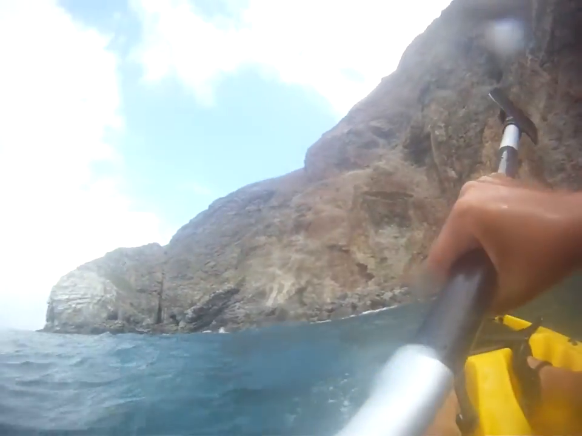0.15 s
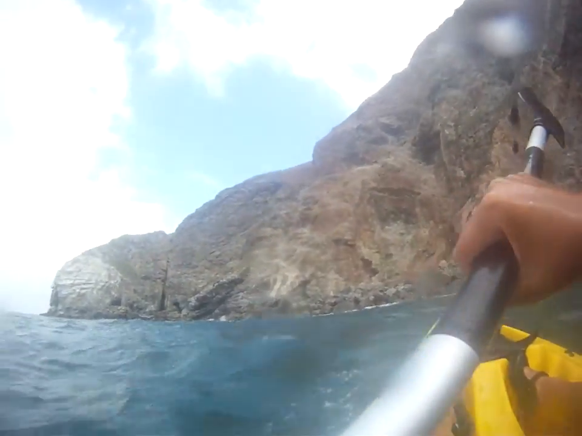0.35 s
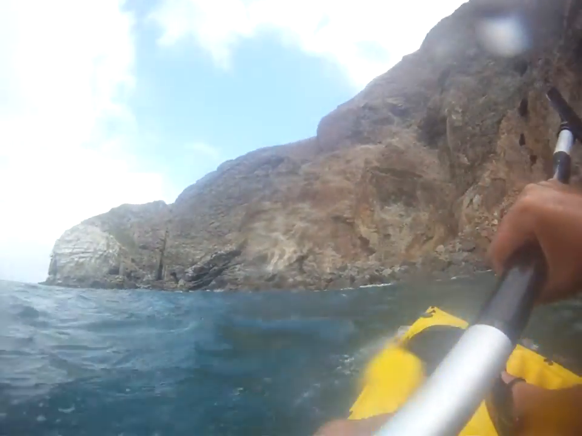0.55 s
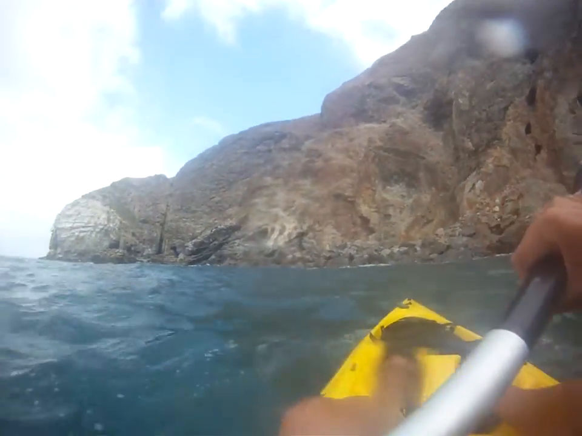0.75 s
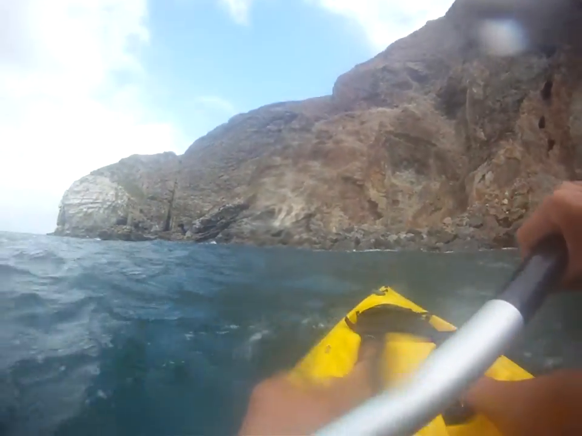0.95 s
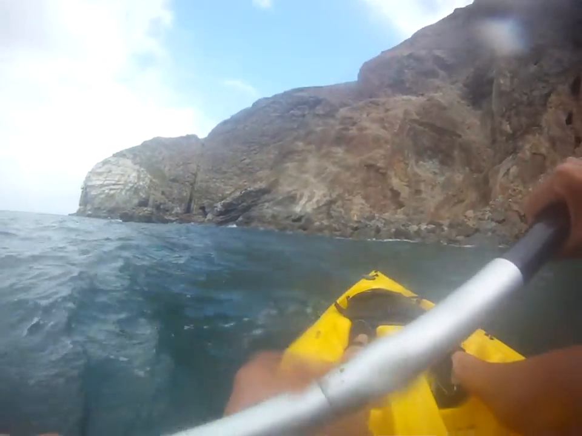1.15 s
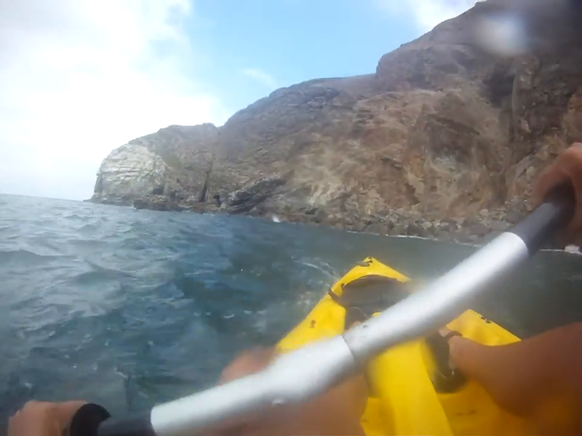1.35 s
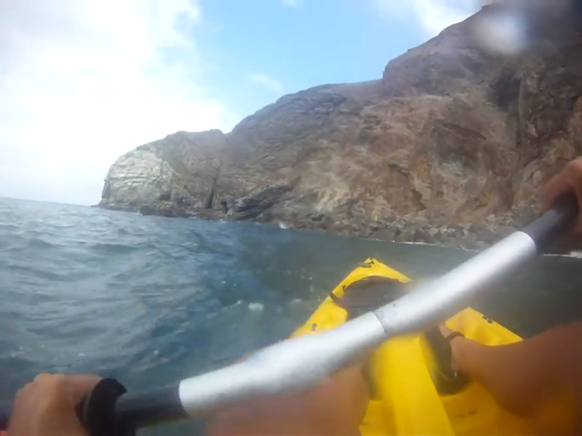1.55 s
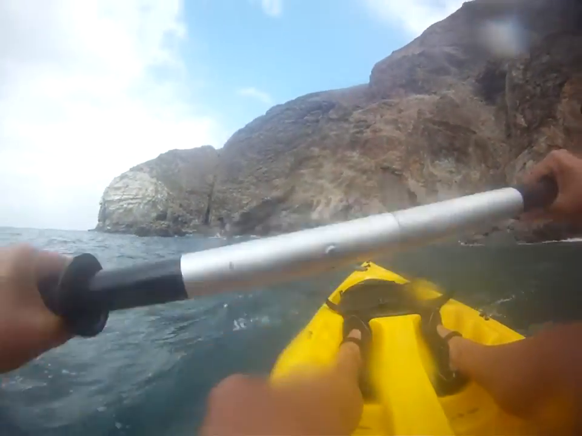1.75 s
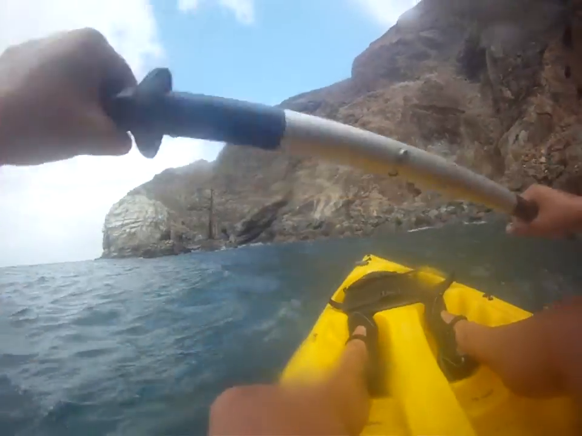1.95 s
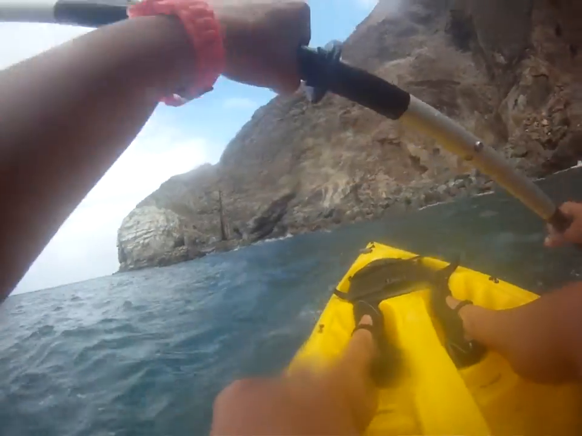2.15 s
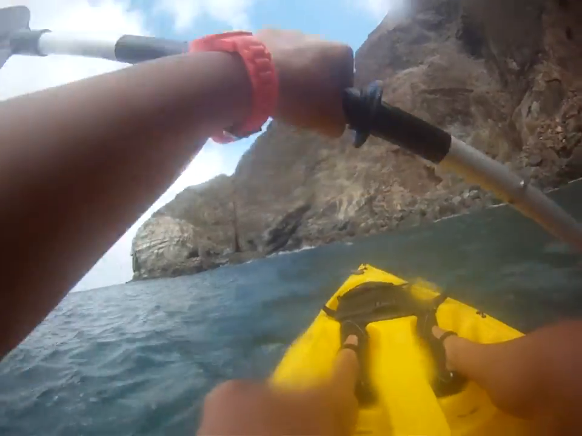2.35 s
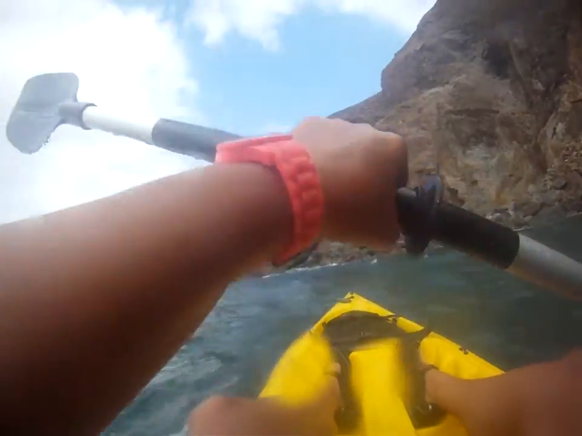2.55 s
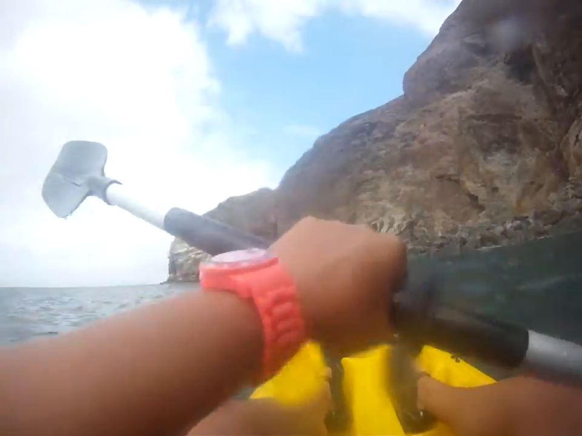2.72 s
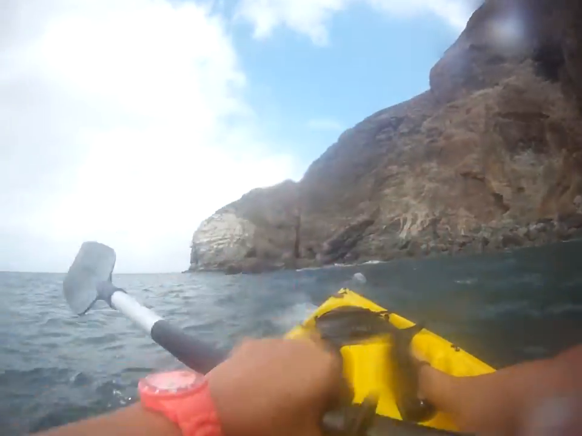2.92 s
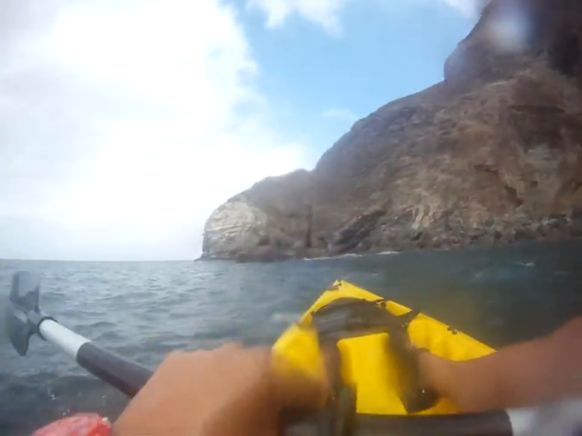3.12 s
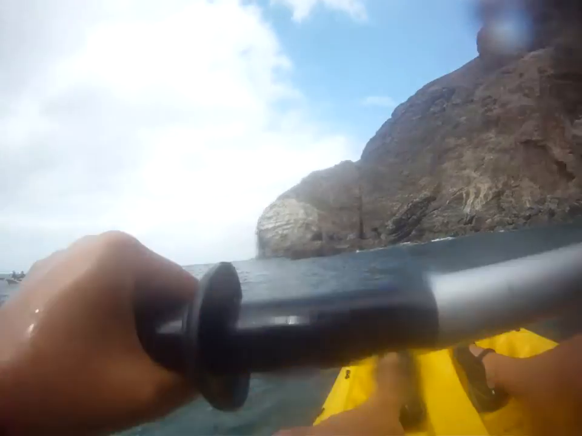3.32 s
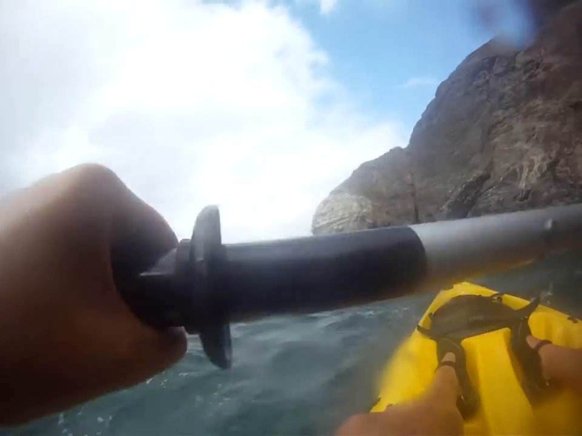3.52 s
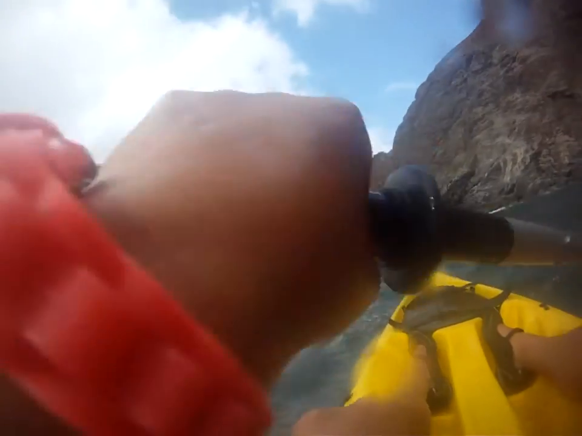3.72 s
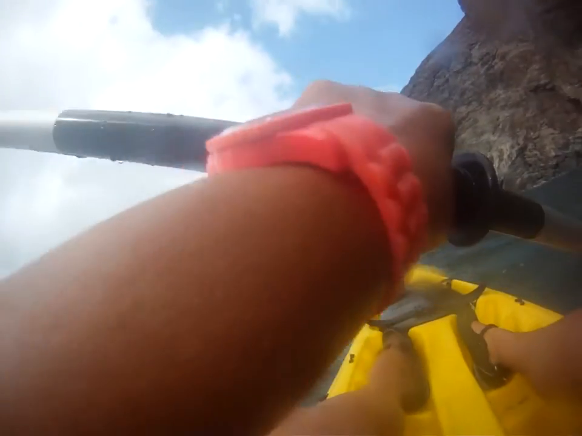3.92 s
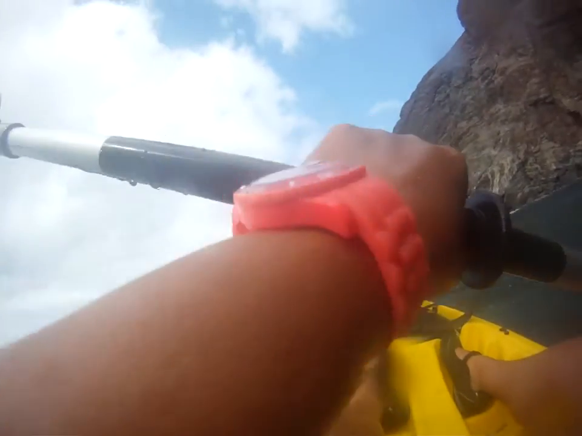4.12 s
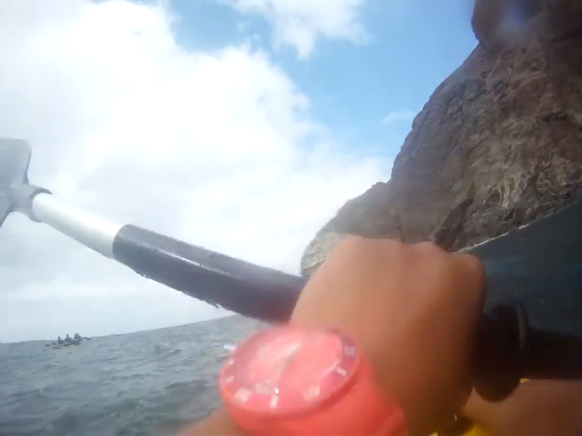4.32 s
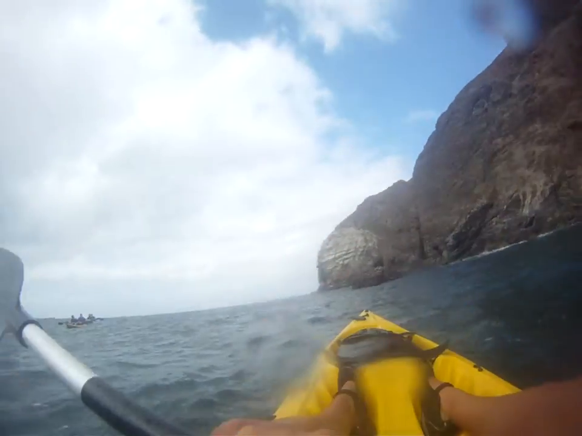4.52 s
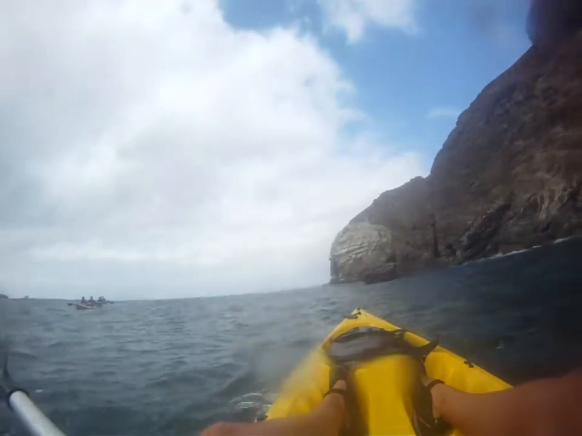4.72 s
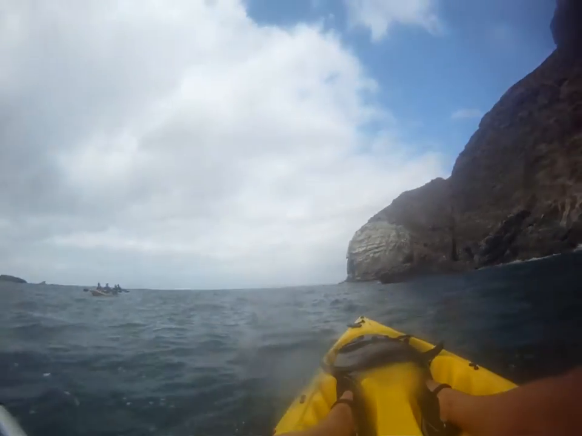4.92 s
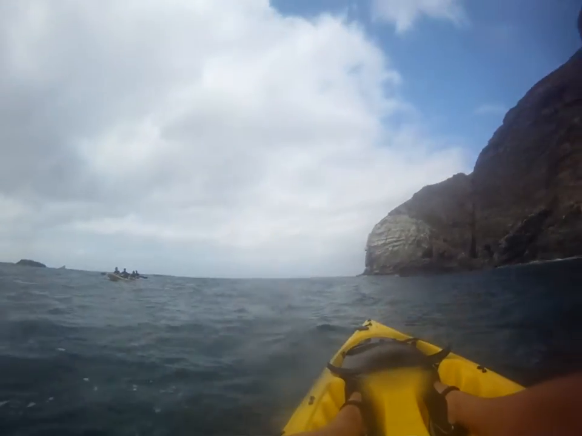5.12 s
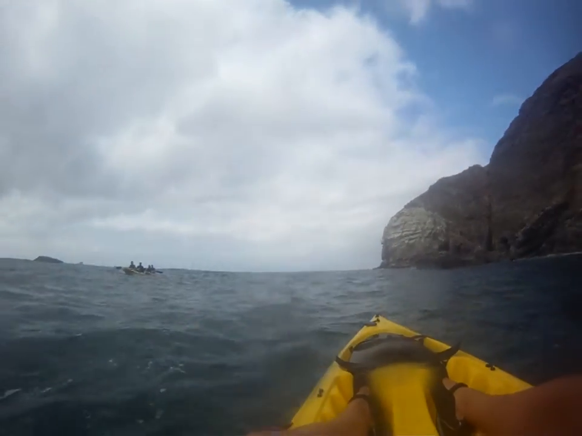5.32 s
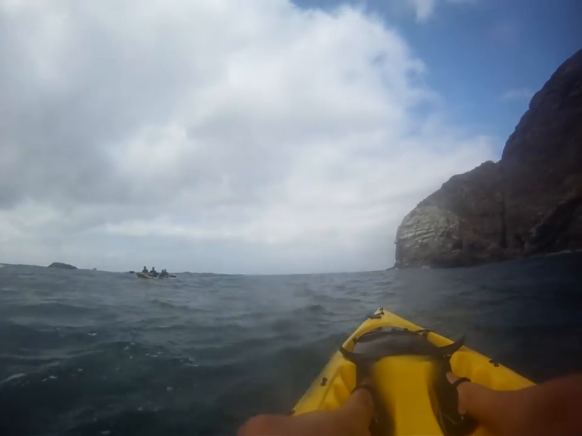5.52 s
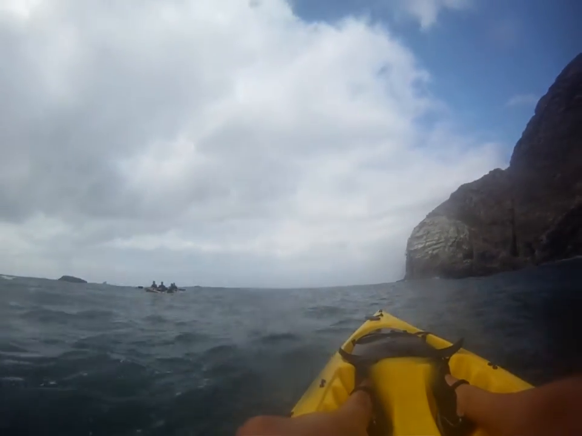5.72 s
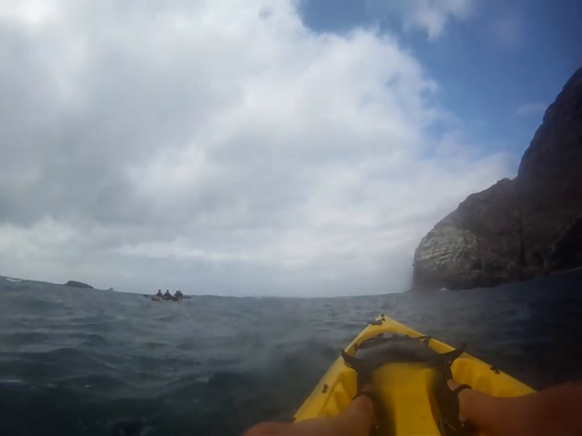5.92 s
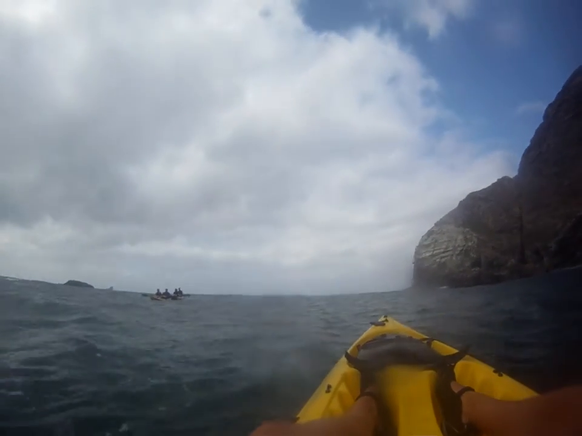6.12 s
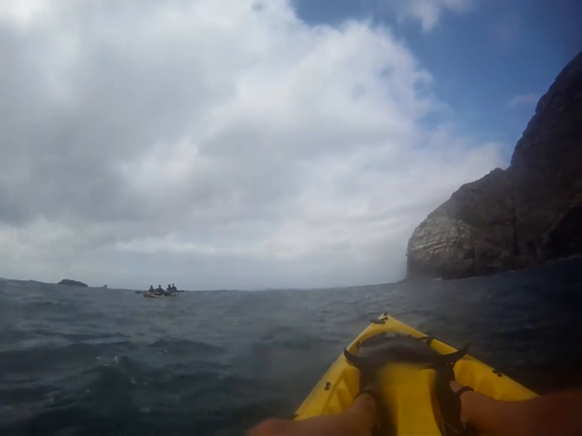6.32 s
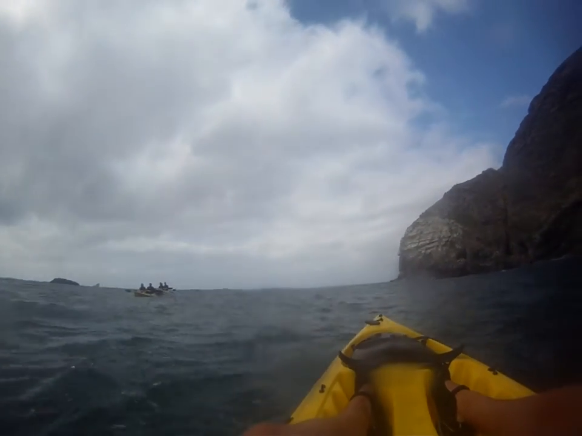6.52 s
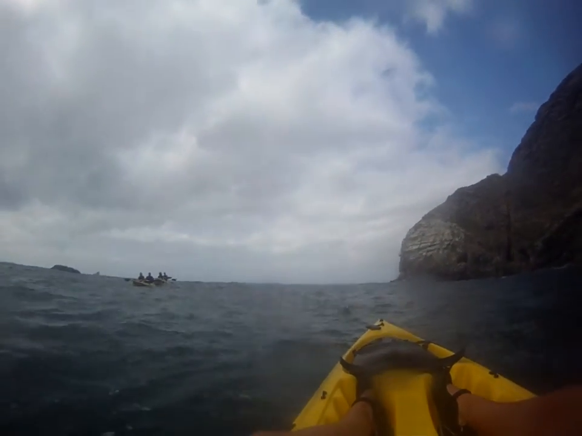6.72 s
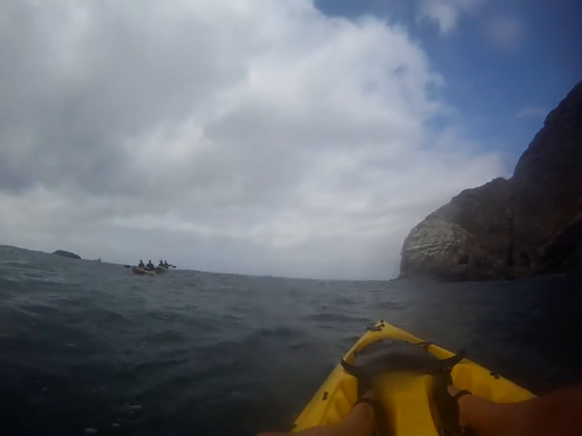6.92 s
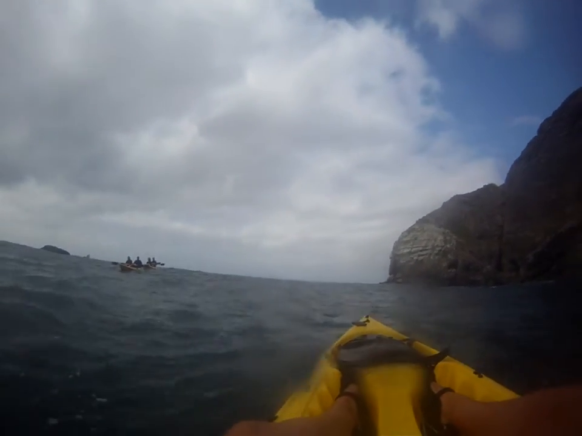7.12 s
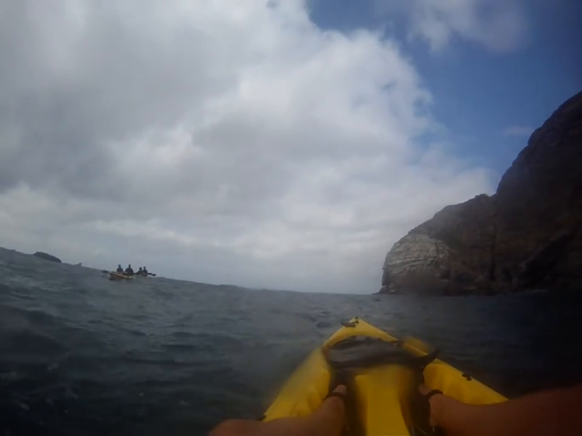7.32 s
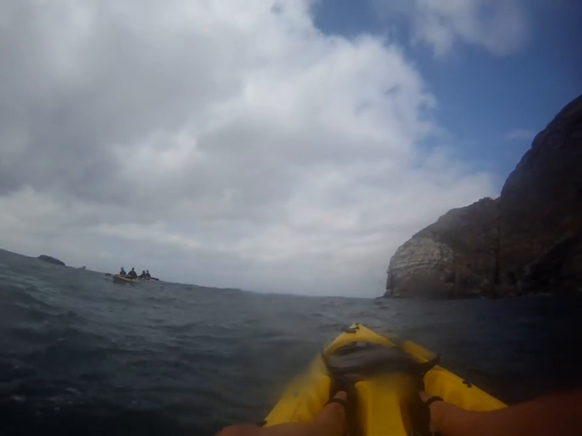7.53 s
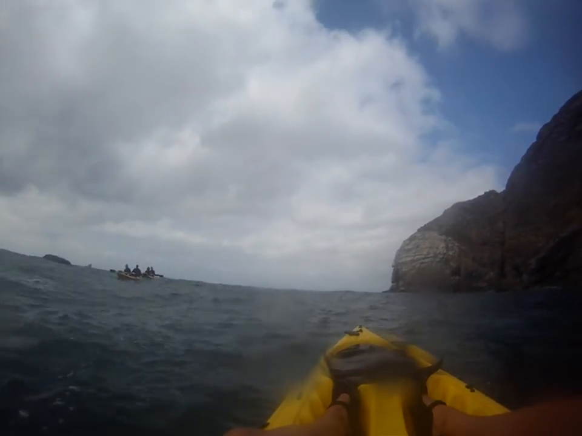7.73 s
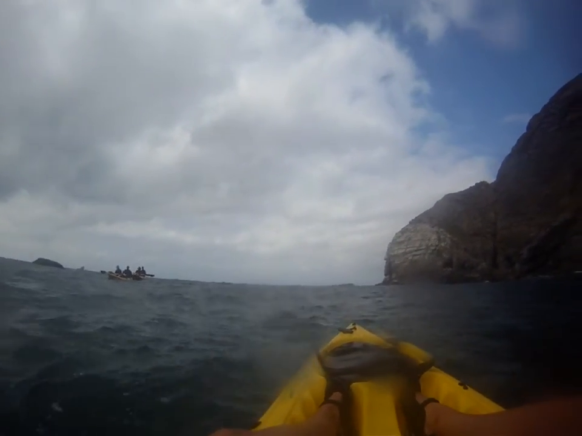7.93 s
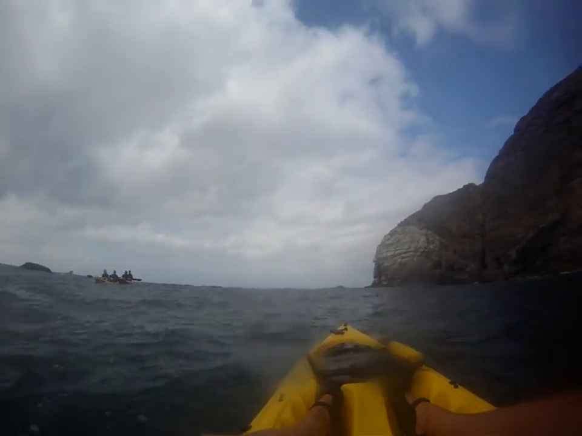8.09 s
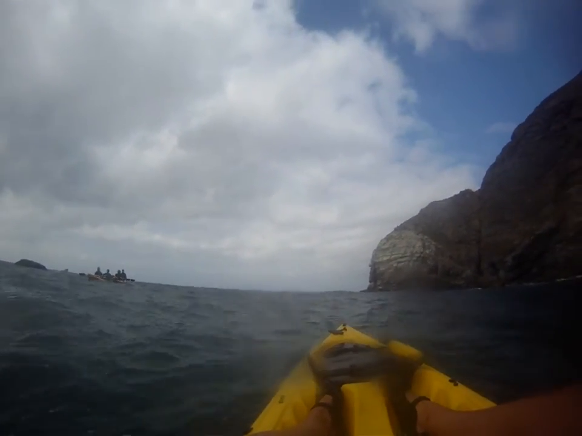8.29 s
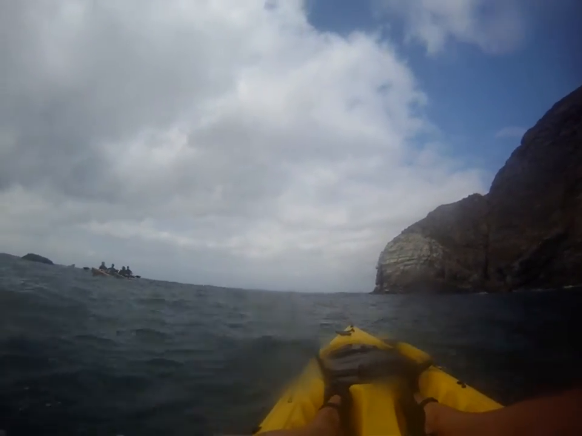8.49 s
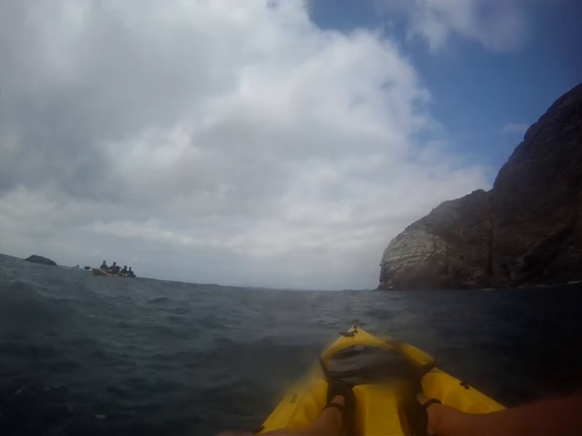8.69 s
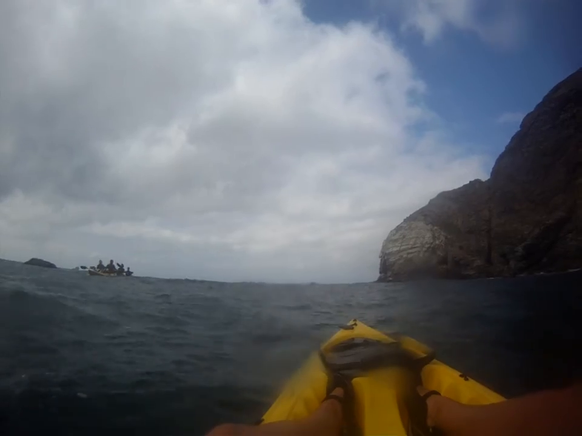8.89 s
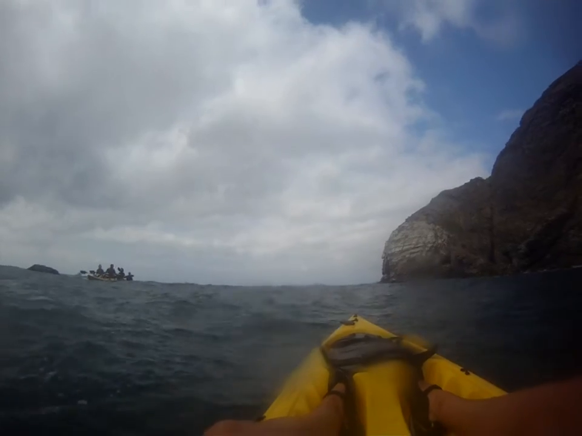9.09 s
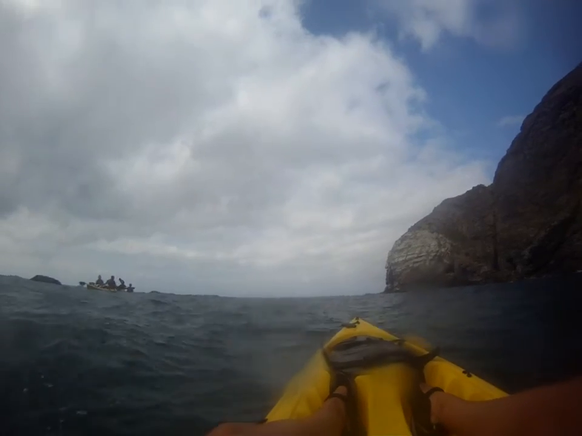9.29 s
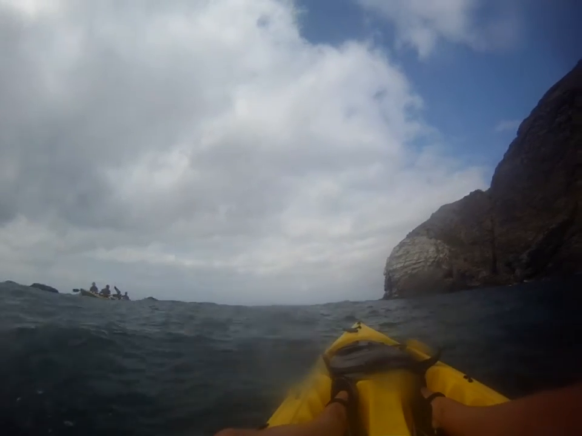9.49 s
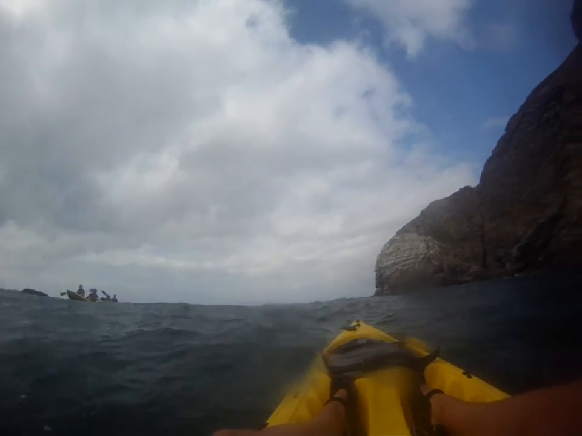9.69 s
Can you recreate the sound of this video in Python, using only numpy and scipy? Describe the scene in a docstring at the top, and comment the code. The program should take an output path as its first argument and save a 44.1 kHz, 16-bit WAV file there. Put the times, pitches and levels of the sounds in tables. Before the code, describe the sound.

Paddle strokes splash and drip in choppy sea water, then small waves gulp around a drifting kayak over a low wind rumble.

```python
"""Paddle strokes splash and drip on a choppy sea, then wavelets gulp under a drifting plastic kayak.
The water is hissing, sloshing noise full of small ringing bubbles; the gulps are trapped air.
We listen from a camera in a waterproof case worn by the paddler: a hard tick strikes the case,
the hull is knocked once, and wind and movement rumble through the mount.
The camera samples slowly and holds each sample, which mirrors the water into a gritty treble."""
import sys
import numpy as np
from scipy import signal
from scipy.fft import rfft, irfft, next_fast_len
from scipy.io import wavfile
from scipy.ndimage import map_coordinates

SR = 44100
rng = np.random.default_rng(int(sys.argv[2]) if len(sys.argv) > 2 else 0)


def dump(signal):
    """Clip the signal to [-1, 1] and save it as 16-bit WAV at the path in sys.argv[1]."""
    limited = np.clip(np.atleast_2d(signal).T, -1, 1)
    pcm = np.round(limited * 32767).astype(np.int16)
    wavfile.write(sys.argv[1], SR, pcm)


N = 429975


def amp(db):
    """Decibels to gain."""
    return 10 ** (np.asarray(db) / 20)


def unit(x):
    """x at rms 1."""
    return x / np.sqrt(np.mean(x ** 2) + 1e-20)


def along(points, hz):
    """An EQ curve: (frequency, value) points joined on a log frequency axis."""
    freqs, values = np.transpose(points)
    return np.interp(np.log(hz + 1), np.log(freqs + 1), values)


def fader(points):
    """A fader ride: (time, value) points joined into one value per sample."""
    times, values = np.transpose(points)
    return np.interp(np.arange(N) / SR, times, values)


def wobble(rate):
    """A smooth random curve, rate knots a second."""
    knots = rng.standard_normal(int(N * rate / SR) + 4)
    return map_coordinates(knots, [np.arange(N) * rate / SR])


def add(track, s, sound):
    """Mix a sound into the track at s seconds."""
    part = track[max(round(s * SR), 0):][:len(sound)]
    part += sound[:len(part)]


def filtered(x, response):
    """Equalise x with a gain given as a function of frequency."""
    size = next_fast_len(N + SR // 2)
    return irfft(rfft(x, size) * response(np.fft.rfftfreq(size, 1 / SR)), size)[..., :N]


def impulse(spectrum, resonances=(), size=8192):
    """The minimum-phase click of a spectrum with resonant peaks on it."""
    hz = np.fft.rfftfreq(size, 1 / SR)
    peaks_db = sum(db / (1 + (2 * (hz - centre) / width) ** 2) for centre, width, db in resonances)
    cepstrum = irfft(np.log(amp(along(spectrum, hz) + peaks_db)))
    causal_fold = 1 + np.sign(size // 2 - np.arange(size))
    causal_fold[0] = 1
    return irfft(np.exp(rfft(cepstrum * causal_fold)))


def through_case(x, spectrum):
    """x shaped by a spectrum and ringing in the waterproof case, at rms 1."""
    # Resonances of the case: (frequency [Hz], width [Hz], gain [dB])
    case_modes = [(1136, 130, 4), (1730, 320, 7.5), (2037, 470, 5), (2506, 210, 9), (3030, 250, 10.5),
                  (3350, 190, -2), (3542, 230, 11.5)]
    return unit(signal.fftconvolve(x, impulse(spectrum, case_modes))[:len(x)])


def bubbles(activity, low_hz, high_hz, cycles, spread_db, count, size=600):
    """A cloud of short rising rings, densest where the water is most active, at rms 1."""
    chance = np.cumsum(activity)
    when, pitch, strength = rng.random((count, 3)).T[:, :, None]
    start = np.searchsorted(chance, when * chance[-1])
    hz = low_hz * (high_hz / low_hz) ** pitch
    turns = hz * np.arange(size) / SR
    age = np.minimum(turns / cycles, 10)
    gain = amp(-spread_db * np.log(strength + .02))
    rings = gain * np.exp(-age) * np.sin(2 * np.pi * turns * (1 + 0.021 * age))
    cloud = np.bincount((start + np.arange(size)).ravel(), rings.ravel(), len(chance))
    return unit(cloud[:len(chance)])


def rumble():
    """The mount sways with the paddler, then settles; wind booms on the case in lumps."""
    # Tone of the sway and of the wind: (frequency [Hz], relative level [dB])
    sway_eq = [(10, -13.5), (25, 5.5), (55, 4), (80, -8.5), (160, -32.5), (600, -65)]
    boom_eq = [(35, -17.5), (65, -2), (95, 1.5), (160, -7.5), (260, -10.5), (600, -55.5), (2000, -99)]
    # Gusts, steady once the boat drifts: (time [s], relative level [dB])
    gusts = [(0.0, -57), (0.15, -48.5), (0.78, -56), (1.1, -49.5), (1.98, -59.5), (2.55, -59), (2.78, -65),
             (2.81, -79), (2.94, -61.5), (4.41, -58.5), (4.44, -65), (5.0, -68)]
    sway_db = fader([(4.75, -55.5), (5.04, -62)]) + 0.93 * wobble(11)
    sway = amp(sway_db) * through_case(rng.standard_normal(N), sway_eq)
    wind_db = fader(gusts) + 3 + 1.6 * wobble(14)
    wind = amp(wind_db) * through_case(rng.standard_normal(N), boom_eq)
    return sway + wind


def jolts():
    """Soft low thumps: the mount swings for a few cycles after each jolt."""
    # Jolts of the mount: (time [s], pitch [Hz], level [dB], t60 [s])
    thumps = [(0.321, 42, -36, 0.19), (0.524, 40, -28.5, 0.14), (1.66, 45, -39, 0.13),
              (2.165, 52, -37, .13), (4.086, 50, -38, .12), (4.44, 40, -42, .15), (4.62, 55.3, -41, .15),
              (6.49, 60, -46, 0.14), (7.19, 35, -44, 0.13)]
    out, t = np.zeros(N), np.arange(SR // 4) / SR
    for s, hz, db, t60 in thumps:
        add(out, s, -amp(db - 60 * t / t60) * np.sin(2 * np.pi * hz * t))
    return out


def slosh(lift_db):
    """Chop rolls along the hull with large soft bubbles in it, partly following the water's lift."""
    # Body of the chop: (frequency [Hz], relative level [dB])
    slosh_eq = [(60, -27.5), (150, 3.5), (260, 0), (350, -0.5), (480, 0), (700, -4), (1130, -7.5),
                (1500, -14), (2500, -45.5), (6000, -85)]
    calm_db, follow = -59, .52
    level_db = calm_db + follow * lift_db
    gurgle = bubbles(amp(level_db), 239, 993, cycles=2.13, spread_db=-1, count=1200, size=2000)
    chop = through_case(rng.standard_normal(N) + amp(-17.5) * gurgle, slosh_eq)
    return amp(level_db + 0.19 * wobble(11)) * chop


def froth(level_db, spectrum, cloud, cloud_db, surge_db):
    """An even rush of sea; nearer bubbles and surges come forward as its level rises."""
    activity = amp(np.minimum(level_db - np.median(level_db), 2))
    share = amp(cloud_db) * activity
    mix = through_case(rng.standard_normal(N), spectrum) + share * through_case(cloud, spectrum)
    return amp(level_db + surge_db * activity) * mix / np.sqrt(1 + share ** 2)


def paddling():
    """How hard the blades stir the water: each stroke builds, holds through its pull and dies away."""
    # Paddle strokes: (start of full pull [s], length [s], relative level [dB])
    strokes = [(0.1, .27, -53), (1.1, .58, -58.5), (2.5, .66, -55), (4.3, .3, -57.5)]
    attack_s, release_s = .3, .3
    stir, t = np.zeros(N), np.arange(N) / SR
    for s, length, db in strokes:
        build = np.minimum((t - s) / attack_s, 0)
        fade = np.maximum((t - s - length) / release_s, 0)
        stir += amp(db) * np.exp(build - fade)
    return stir


def blade_swirl(stir, churn):
    """The blades tear the water into a surging rush with bubbling eddies."""
    # Tone of stirred water: (frequency [Hz], relative level [dB])
    swirl_eq = [(300, -10.5), (700, -1.5), (1150, 1.5), (1700, -0.5), (2350, -3.5), (3600, -23),
                (6000, -35)]
    eddies = bubbles(stir, 937, 2390, cycles=3.2, spread_db=4.5, count=1200)
    rush = through_case(rng.standard_normal(N), swirl_eq)
    torn = rush + amp(-10) * through_case(eddies, swirl_eq)
    return amp(-0.2 + 2.5 * churn) * stir * torn


def water(stir):
    """The sea bed: slosh under a hull wash, fine fizz and blade swirl that surge together."""
    # Water running along the hull, easing as the boat drifts: (time [s], relative level [dB])
    flow = [(0, -56.5), (1.1, -57.5), (3.1, -58), (3.55, -60), (4.8, -57), (6.6, -57), (7.3, -59),
            (9.75, -59.5)]
    # Tone of the wash and of the fizz: (frequency [Hz], relative level [dB])
    wash_eq = [(300, -8.5), (700, -2), (1050, -4), (1800, 0.5), (2600, -6), (3600, -21.5), (6000, -40)]
    fizz_eq = [(1000, -28), (1900, -7), (2500, -1), (3100, -2), (3800, 0), (4500, -3.5), (5200, -1),
               (6000, -10.5)]
    flow_db = fader(flow)
    churn = unit(wobble(11) + wobble(40))

    def blend_db(flow_gain_db, stroke_gain_db):
        """Flow and strokes summed in power."""
        return 20 * np.log10(np.hypot(amp(flow_db + flow_gain_db), amp(stroke_gain_db) * stir))

    coarse = bubbles(amp(flow_db) ** 2, 897, 2400, cycles=3, spread_db=2.5, count=2500)
    wash = froth(flow_db + 1.5, wash_eq, coarse, cloud_db=-8.5, surge_db=0.69 * churn)
    fizz_db = blend_db(-0.45, 0.78)
    fine = bubbles(amp(fizz_db) ** 2, 2104, 6620, cycles=3.4, spread_db=6.5, count=3000)
    fizz = froth(fizz_db, fizz_eq, fine, cloud_db=-9.5, surge_db=0.68 * churn)
    lift_db = blend_db(0, -6) - flow_db.min()
    return slosh(lift_db) + wash + fizz + blade_swirl(stir, churn)


def sprinkles():
    """Each shower is a few dozen tiny rings of about one size, swelling and fading."""
    # Showers of drops and bubbles: (centre time [s], pitch [Hz], level [dB], half length [s])
    showers = [(0.29, 1800, -52, 0.093), (0.312, 4270, -57, .035), (0.674, 4700, -60, .04),
               (1.645, 4500, -59, 0.07), (2.038, 4560, -59.5, .03), (2.627, 4350, -53, 0.009),
               (2.95, 4600, -55, .006), (3.047, 2460, -52.5, .08), (4.832, 4720, -58, 0.033),
               (6.297, 2850, -51.5, .016), (6.776, 2490, -55, .025)]
    out = np.zeros(N)
    for s, hz, db, half_s in showers:
        span = np.linspace(-2, 2, round(4 * half_s * SR))
        swell = np.exp(-span ** 2)
        even = np.ones(len(span))
        drops = bubbles(even, 0.924 * hz, 1.07 * hz, cycles=9.2, spread_db=5, count=70, size=400)
        add(out, s - 2 * half_s, amp(db) * swell * drops)
    return out


def hull_knock():
    """One dull knock rings the damped plastic hull."""
    # Modes of the hull: (frequency [Hz], relative level [dB], t60 [s])
    hull_modes = [(425, -16, 0.032), (680, 4, 0.023), (788, 2, 0.016), (1070, -2, 0.019),
                  (1400, 1.5, 0.017)]
    out, t = np.zeros(N), np.arange(SR // 10) / SR
    ring = sum(amp(db - 60 * t / t60) * np.sin(2 * np.pi * hz * t) for hz, db, t60 in hull_modes)
    attack = 1 - np.exp(-t / 0.0014)
    add(out, s=2.4785, sound=-amp(-29) * attack * ring)
    return out


def case_tick():
    """One hard, sharp tick right on the case."""
    # Tone of the tick: (frequency [Hz], relative level [dB])
    tick_eq = [(300, -34), (700, -34), (1050, -11), (1400, -14), (1700, -3), (1980, 7.5), (2450, 8.5),
               (3100, -2.5), (3700, 2), (4250, -10), (4700, 0.5), (5400, -13.5)]
    out = np.zeros(N)
    add(out, s=0.42485, sound=-amp(7.2) * impulse(tick_eq))
    return out


def gulps():
    """Trapped air swells, rings and rises a little in pitch as it fades."""
    # Air pockets closing under hull and blade: (time [s], start pitch [Hz], relative level [dB], t60 [s])
    pockets = [(1.585, 520, -39, .04), (1.721, 252, -35, 0.057), (2.337, 388, -42.5, 0.055),
               (2.483, 274, -39.5, .06), (2.640, 350, -39, 0.046), (2.905, 450, -42, 0.06),
               (3.411, 228, -45, 0.11), (5.250, 268, -47, .08), (5.616, 420, -37.5, .04),
               (6.477, 228, -33.5, 0.061), (6.514, 240, -33.5, 0.036), (7.600, 208, -43, 0.086),
               (7.624, 324, -42, 0.051), (8.32, 170, -49, 0.13)]
    out, t = np.zeros(N), np.arange(SR // 4) / SR
    attack = 1 - np.exp(-t / 0.0047)
    for s, hz, db, t60 in pockets:
        phase = 2 * np.pi * hz * t * (1 + .1 * t / t60)
        add(out, s, amp(db + 2.5 - 60 * t / t60) * attack * np.sin(phase))
    return out


def drips(stir, count):
    """Stray drops off the blade, thickest around each pull, as rows for splashes()."""
    low_hz, high_hz, spread_db = 1050, 3700, 5
    when, pitch, ring, burst = rng.random((count, 4)).T
    chance = np.cumsum(stir)
    s = np.searchsorted(chance, when * chance[-1]) / SR
    hz = low_hz * (high_hz / low_hz) ** pitch
    bubble_db = -57.5 + spread_db * (2 * ring - 1)
    spatter_db = -53 + spread_db * (2 * burst - 1)
    return list(zip(s, hz, bubble_db, spatter_db))


def splashes(stray_drops):
    """Each drop rings a short rising bubble amid a burst of spatter, with a thin patter after it."""
    # The nearest splashes: (time [s], bubble pitch [Hz], bubble level [dB], spatter level [dB])
    near_drops = [(0.1994, 2530, -45.5, -43.5), (0.3316, 3360, -52, -45), (0.4747, 3660, -54, -42),
                  (1.05, 3660, -55, -53), (1.188, 2960, -47, -51), (1.36, 1700, -59, -49),
                  (1.609, 1080, -47.5, -45.5), (1.6543, 2890, -47.5, -44), (1.694, 774, -57, -44),
                  (2.0372, 1720, -47.5, -48.5), (2.0941, 1120, -50, -57), (2.2967, 1450, -50, -53),
                  (2.3795, 1700, -46.5, -49), (2.6312, 3770, -47, -44.5), (2.9444, 1460, -50, -60),
                  (3.8566, 3380, -56, -44), (3.957, 1630, -47, -49.5), (4.1111, 2580, -50, -54),
                  (4.2256, 3060, -51, -52), (4.258, 1730, -44.5, -59), (4.373, 1650, -49, -48),
                  (4.3893, 3150, -47, -50), (4.4412, 3510, -49, -46.5), (4.523, 1620, -43.5, -53),
                  (4.6686, 1610, -50, -54), (5.463, 2390, -54, -49.5), (6.2844, 2560, -51, -49.5),
                  (6.7874, 1490, -53, -55), (7.435, 3550, -55.5, -55), (8.041, 1200, -57, -53),
                  (8.1973, 1030, -54, -58), (8.2701, 1920, -53, -51.5), (8.8782, 2340, -51.5, -54)]
    # Tone of the spatter: (frequency [Hz], relative level [dB])
    spatter_eq = [(300, -9), (1000, 0.5), (2000, -0.5), (3500, -2.5), (5500, -9.5)]
    out, t = np.zeros(N), np.arange(SR // 8) / SR
    attack = 1 - np.exp(-t / 0.00037)
    glide = 1.03 - .06 * np.exp(-t / .006)
    burst, patter = amp(-60 * t / 0.025), amp(-10 - 60 * t / 0.13)
    trim = np.sqrt(SR / 100 / len(t))  # a drop carries the energy of 10 ms at its levels
    for s, hz, bubble_db, spatter_db in list(near_drops) + stray_drops:
        bubble = attack * amp(-60 * t / 0.029) * np.sin(2 * np.pi * hz * glide * t)
        spatter = through_case(attack * (burst + patter) * rng.standard_normal(len(t)), spatter_eq)
        add(out, s, trim * (amp(bubble_db) * unit(bubble) + amp(spatter_db) * spatter))
    return out


def scene():
    """Everything reaches one microphone inside the case, the same on both channels."""
    stir = paddling()
    sea = water(stir) + sprinkles() + gulps() + splashes(drips(stir, count=16))
    return np.tile(rumble() + jolts() + hull_knock() + case_tick() + sea, (2, 1))


def record(dry):
    """Sample-and-hold grit: the sound mirrors about the hold rate, weaker the nearer it lands to it."""
    # The camera's roll-off around half its hold rate: (frequency [Hz], gain [dB])
    roll_off = [(5200, -0.5), (5600, -1.5), (5950, -7), (6100, -40), (7000, -100)]
    hold_hz, top_hz = 12000, 15350
    narrow = filtered(dry, lambda hz: amp(along(roll_off, hz)))
    mirrored = narrow * (1 + 2 * np.cos(2 * np.pi * hold_hz * np.arange(N) / SR))
    return filtered(mirrored, lambda hz: np.sinc(hz / hold_hz) * (hz < top_hz))


dry = scene()
out = record(dry)
dump(out)
```